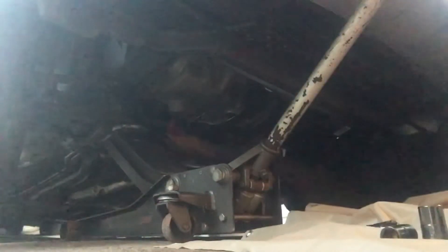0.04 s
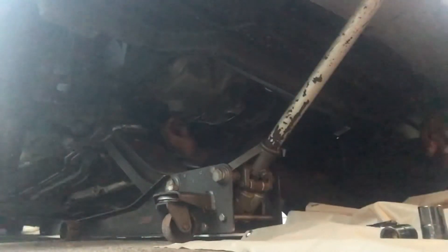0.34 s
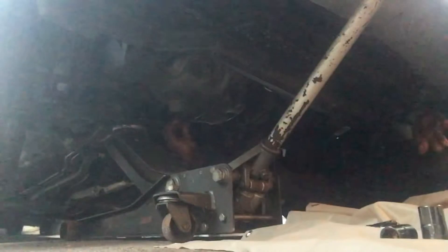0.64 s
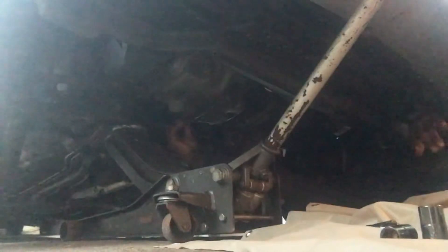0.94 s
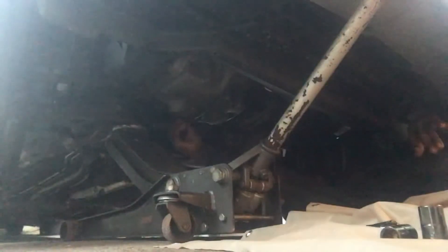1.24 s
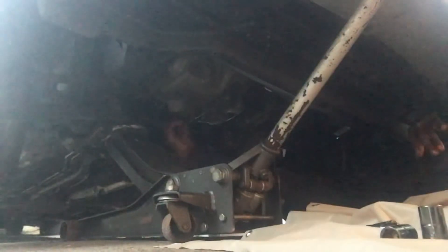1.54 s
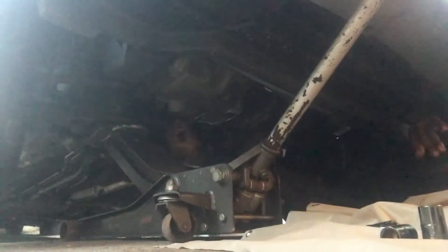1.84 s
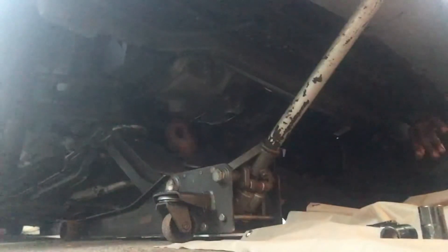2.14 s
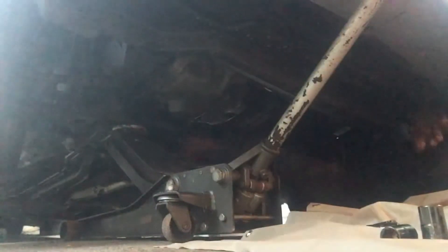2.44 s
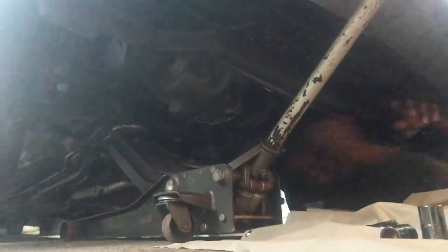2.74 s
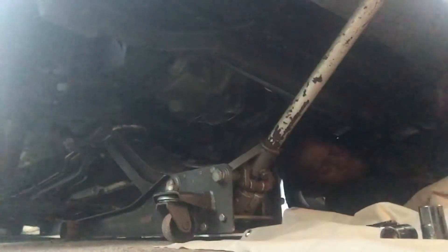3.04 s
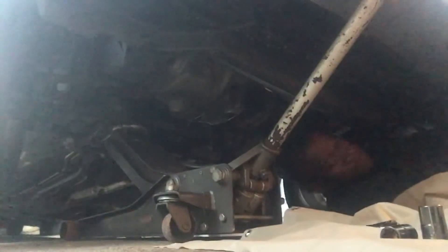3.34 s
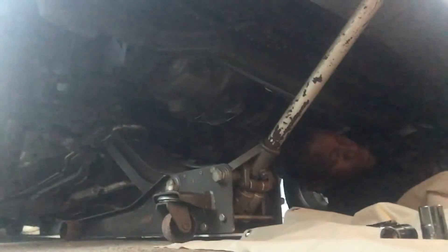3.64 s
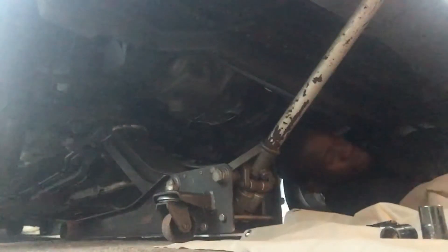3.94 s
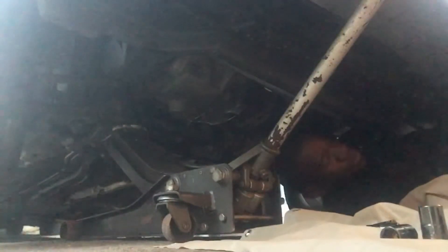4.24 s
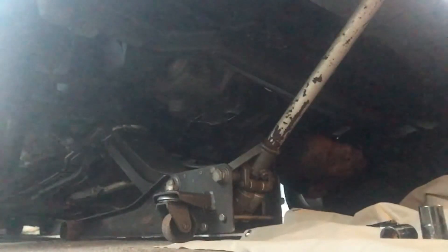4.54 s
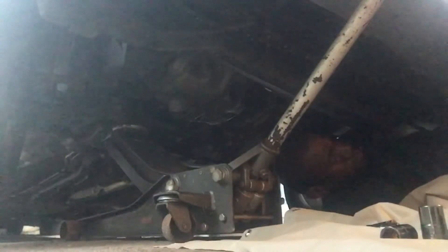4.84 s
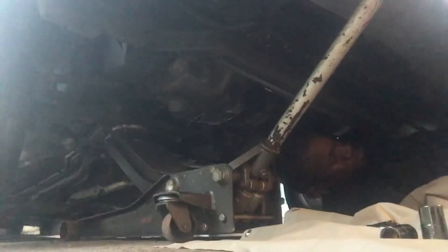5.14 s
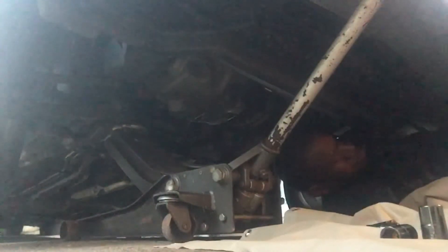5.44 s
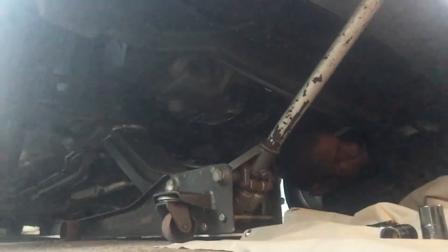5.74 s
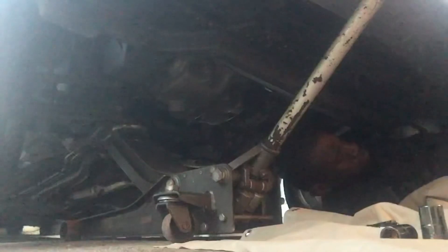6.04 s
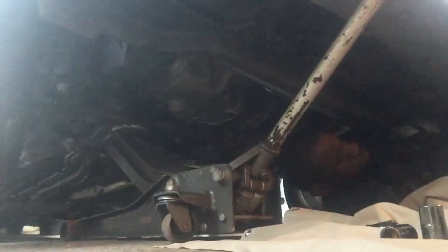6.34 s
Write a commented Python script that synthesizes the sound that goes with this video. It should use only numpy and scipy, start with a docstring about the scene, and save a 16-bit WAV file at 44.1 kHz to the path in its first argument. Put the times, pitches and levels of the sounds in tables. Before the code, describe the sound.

After a faint brush of cloth, a socket wrench clinks unevenly on a bolt under a jacked-up car, each knock ringing briefly. Someone then shifts on a floor sheet: cloth rustles and snaps softly, with dull bumps and the thin ring of a sliding tool. Small metal parts click in the hands, growing fainter. Everything is close to the microphone, with little echo and a faint garage hum behind.

```python
"""A faint brush of cloth, then a socket wrench clinks on its bolt, close by, under a jacked-up car.
Each knock rings the steel and rattles the underbody. The worker then shifts over on a sheet on the
garage floor: cloth rustles and snaps, a weight bumps, a loose steel tool slides and rings, and small
parts click in the hands. All of this is near the microphone, with only a weak, short echo;
a faint hum, a low rumble and a distant drone fill the garage behind it."""
import sys
import numpy as np
from scipy import signal
from scipy.fft import rfft, irfft, next_fast_len
from scipy.io import wavfile
from scipy.ndimage import uniform_filter1d

SR = 44100
rng = np.random.default_rng(int(sys.argv[2]) if len(sys.argv) > 2 else 0)


def generate_wav(signal):
    """Clip the signal to [-1, 1] and save it as 16-bit WAV at the path in sys.argv[1]."""
    frames = np.transpose(np.atleast_2d(signal))
    scaled = np.clip(frames, -1, 1) * 32767
    pcm = np.round(scaled).astype(np.int16)
    wavfile.write(sys.argv[1], SR, pcm)


N = 290291
TIME = np.arange(N) / SR

# room tone of the garage: (frequency [Hz], relative density [dB])
ROOM_SPECTRUM = [(12, -42.5), (20, -37), (47, 3), (103, 1.5), (282, -8.5), (342, -5), (452, -12),
                 (597, -13), (1130, -32), (1380, -38), (1630, -42.5), (2210, -41.5), (4810, -51),
                 (9930, -57), (15500, -64)]
# sounds far from the microphone: (time [s], relative drone level [dB], relative wash level [dB])
DISTANT_LEVELS = [(0.0, -62.5, -57), (0.42, -64.5, -67), (1.8, -64, -71.5), (2.2, -66.5, -77.5),
                  (4.1, -65, -75.5), (5.35, -68.5, -74.5), (5.88, -72, -83), (6.25, -63, -85.5),
                  (6.58, -68, -83.5)]
# resonances of a light drag over the floor:
# (start frequency [Hz], end frequency [Hz], width [Hz], start level [dB], end level [dB])
DRAG_RESONANCES = [(375, 555, 71, -73, -57.5), (980, 1000, 120, -63.5, -73), (2300, 2230, 73, -70, -75),
                   (11000, 10700, 450, -79, -135)]
# dull bumps on the floor: (time [s], level [dB], starting pitch [Hz], length [s])
FLOOR_BUMPS = [(2.278, -46.5, 411, 0.013), (2.281, -45.5, 188, 0.015), (2.63, -50, 276, 0.012),
               (2.649, -45, 379, 0.0192), (3.695, -46.5, 325, 0.0572)]
# rustle of the cloth: (frequency [Hz], relative density [dB])
CLOTH_SPECTRUM = [(120, -10), (220, 0), (400, 6.5), (600, -1.5), (790, 1.5), (1000, -1), (1400, -3),
                  (1750, -2.5), (2450, 0), (3200, -21), (4500, -26.5), (9000, -46)]
# fizz of its brushing fibres: (frequency [Hz], relative density [dB])
FIBRE_SPECTRUM = [(2000, 1.5), (3200, 10), (4200, -1.5), (5200, 3.5), (6500, 6.5), (8000, 1), (9500, -1),
                  (10500, -9.5), (13000, -6.5), (15500, -25)]
# hollow resonances of the gap under the car: (frequency [Hz], width [Hz], relative level [dB])
GAP_RESONANCES = [(591, 112, 2), (940, 94, -3), (1302, 174, -0.5), (2130, 710, -1)]
# cloth dragged over the floor: (time [s], length [s], relative rustle [dB], relative fizz [dB])
CLOTH_STROKES = [(0.0, 0.45, -64.5, -79), (2.244, 0.56, -60.5, -72.5), (2.596, 0.25, -45, -61.5),
                 (2.778, 0.2, -57, -77.5), (3.018, 0.43, -50, -64), (3.403, 0.28, -56.5, -70.5),
                 (3.629, 0.32, -53, -65.5), (3.887, 0.21, -68, -75), (5.184, 0.22, -68.5, -77.5)]
# folds that snap free: (time [s], level [dB], bright edge [dB], hollow note [Hz])
FOLD_SNAPS = [(2.608, -40, -14, 500), (2.645, -40.5, -2, 976), (2.688, -36, 11, 622), (2.726, -45, 18, 587),
              (2.78, -53, 0, 595), (2.802, -37, 0, 616), (2.865, -46, -2, 627), (2.926, -50, 11, 976),
              (2.962, -51.5, -6, 935), (3.062, -45, -9, 597), (3.199, -41.5, -7, 937),
              (3.245, -46.5, -6, 620), (3.37, -46, 24, 564), (3.4, -51, -6, 530), (3.553, -47.5, -6, 950),
              (3.806, -44.5, -3, 1770)]
# modes of the sliding steel tool: (frequency [Hz], relative level [dB], t60 [s])
TOOL_MODES = [(6260, -8, 0.11), (6410, -4.5, 0.33), (6770, -13, 0.13), (8949, 2.5, 0.22), (9800, -14, 0.58),
              (10000, -23, .25), (11260, -29, .15), (11950, -23, .15), (12110, -17, 0.2), (13700, -36, .25),
              (15260, -43, .15)]
# the tool catching on grit: (time [s], frequency [Hz], level [dB], t60 [s])
TOOL_CATCHES = [(3.502, 11700, -58, 0.09), (3.502, 6100, -56, 0.07), (3.519, 4225, -47.5, 0.18),
                (3.519, 3390, -53, 0.08), (3.533, 2520, -50, 0.08)]
# small parts in the hands: (time [s], level [dB], thud [dB], bright edge [dB], pitch [Hz])
PART_CLICKS = [(2.272, -64, 8, -24, 980), (3.8883, -47, -12, -8, 1360), (3.9276, -34.5, -23, -5, 2560),
               (3.9364, -36.5, -11, -18, 1970), (4.143, -45, -2, 4, 3060), (4.1669, -36.5, -2.5, 2, 2720),
               (4.331, -58.5, 7, 6, 1360), (4.634, -58, 7, -12, 2140), (4.7672, -54, -4, 4.5, 2300),
               (4.81, -54.5, -10, 12.5, 3020), (5.0305, -54, -1, -1, 1400), (5.153, -57, -8, -16, 1550),
               (5.189, -60, -4, -21, 1410), (5.271, -57, 9, 0, 1360), (5.4086, -55, -10, -19, 1920),
               (5.449, -59, -13, -4, 2200), (5.467, -56, -10, -15, 2140), (5.53, -56, -2, -18, 2280),
               (5.604, -55.5, 3, 2, 1680), (5.8683, -55.5, -10, -7, 2170)]
# the snap of those parts: (frequency [Hz], relative density [dB])
CLICK_SPECTRUM = [(200, -50), (500, 6), (1000, -1), (1400, 0.5), (2300, 4), (3250, -1), (4400, -12),
                  (7400, -12), (11700, -19.5), (15500, -35)]
# modes of wrench and bolt: (frequency [Hz], relative level [dB], t60 of the lingering ring [s])
WRENCH_MODES = [(973, -6, 0.18), (1055, -2, .2), (1149.6, 4, 0.18), (1263, -1.5, 0.17), (1470, 0.5, 0.16),
                (1616, 9.5, 0.066), (1804, 1.5, 0.17), (2166, 10.5, 0.059), (2282, 13, 0.06),
                (2723, 5.5, 0.076), (2900, -1, 0.193), (3100, 5.5, .1), (3350, 3.5, .04),
                (3490, 9.5, 0.083), (3700, -1, 0.15), (3996, 1.5, 0.099), (4380, 4.5, 0.078),
                (4470, -6, .18), (4700, 0, 0.052), (5130, -4, .07), (5310, -2.5, 0.065), (6280, -13.5, 0.2),
                (6490, -10, 0.085), (6630, -14.5, .17), (7700, -11, .06)]
# dense clatter of the underbody: (frequency [Hz], relative density [dB])
UNDERBODY_SPECTRUM = [(200, -15), (450, -14), (780, -6.5), (1100, -3.5), (1700, 1), (2200, 5.5), (3500, 2),
                      (4700, -6), (5800, -8), (8000, -11.5), (10500, -24.5), (15500, -32)]
# the wrench seating on the bolt:
# (time [s], level [dB], low ring [dB], underbody clatter [dB], main ring [Hz], second ring [Hz])
WRENCH_CLINKS = [(0.2076, -46, 8.5, -5.5, 1160, 1600), (0.3506, -34, 0.5, -16, 3950, 3060),
                 (0.5289, -43, 5, -8, 1120, 2350), (0.684, -45, 3, -10, 4760, 3480),
                 (0.7276, -34.5, 1.5, -14, 2330, 4430), (0.8279, -27, 4.5, -4.5, 1200, 1580),
                 (0.852, -40, 2, -5.5, 2850, 4430), (1.234, -40.5, 1.5, -9, 2700, 1140),
                 (1.245, -39, -1, -11.5, 3620, 4050), (1.4871, -46, 5.5, -4.5, 1135, 2320),
                 (1.584, -45.5, -4, -15, 3460, 1770), (1.7377, -30, 0.5, -12, 2240, 1087),
                 (1.8199, -27.5, 2.5, -8, 1740, 1120), (1.855, -40, -1, -12, 3485, 2700),
                 (2.036, -57, 13, -15, 1170, 1770), (2.0728, -53, 8.5, -15, 1700, 2300),
                 (2.086, -44.5, 0.5, -6, 3540, 4000), (2.21, -46.5, -1, -8, 1600, 3030),
                 (2.2371, -37.5, -1.5, -13, 4330, 4100)]
# steel slipping before it seats, or on the rebound: (time [s], level [dB], low ring [dB], main ring [Hz])
WRENCH_SLIPS = [(0.337, -54.5, 18.5, 1140), (0.348, -40, -7, 3430), (0.722, -41, 1, 2290),
                (0.811, -46, -2, 3760), (1.225, -48, 0, 2330), (1.857, -45.5, -10, 2730),
                (2.226, -34, -8, 2250)]

FIRM_DB = -37  # level of a firm contact; harder ones are brighter, lighter ones duller


def amp(db):
    """Decibels to amplitude."""
    return 10 ** (np.asarray(db) / 20)


def unit_rms(x):
    """Scales x to an rms of 1."""
    return x / np.sqrt(np.mean(x ** 2) + 1e-20)


def add(mix, start_s, sound):
    """Mixes a sound in at its start time."""
    part = mix[round(start_s * SR):][:len(sound)]
    part += sound[:len(part)]


def coloured(x, spectrum):
    """Gives x a smooth spectrum and an rms of 1."""
    hz, db = np.transpose(spectrum)
    size = next_fast_len(len(x))
    bins_hz = np.fft.rfftfreq(size, 1 / SR)
    gain = amp(np.interp(np.log(bins_hz + 1), np.log(hz), db))
    return unit_rms(irfft(rfft(x, size) * gain, size)[:len(x)])


def split(x, hz):
    """The parts of x below and above hz."""
    low = signal.sosfiltfilt(signal.butter(3, hz, fs=SR, output="sos"), x)
    return low, x - low


def wander(per_s):
    """A random drift around zero that takes a new course per_s times a second."""
    knots = rng.standard_normal(4000)
    return 1.6 * np.interp(TIME * per_s, np.arange(len(knots)), knots)


def patchy(x, depth_db):
    """Lets each band of x swell and sink on its own; rms of 1."""
    bands = signal.stft(x, nperseg=512, noverlap=384)[2]
    patches = uniform_filter1d(rng.standard_normal(bands.shape), size=4, axis=0)
    patches = unit_rms(uniform_filter1d(patches, size=8, axis=1))
    return unit_rms(signal.istft(bands * amp(depth_db * patches), nperseg=512, noverlap=384)[1][:N])


def resonate(x, hz, width_hz):
    """A steep resonance that may glide; rms of 1."""
    carrier = np.exp(2j * np.pi * np.cumsum(hz * np.ones(N)) / SR)
    pole = np.exp(-np.pi * width_hz / SR)
    return unit_rms((carrier * signal.lfilter([1], [1, -2 * pole, pole * pole], x / carrier)).real)


def grains(per_s, spread_db):
    """Friction as tiny slips of uneven size."""
    size = amp(spread_db * np.minimum(rng.exponential(1, N), 4))
    return unit_rms((rng.random(N) < per_s / SR) * size * rng.choice([-1, 1], N))


def reflections(size, first_per_s=1500, doubling_s=0.005):
    """Echoes off the underbody and the floor: single spikes at first, soon a dense crowd."""
    doublings = np.minimum(np.arange(size) / SR / doubling_s, 10)
    chance = np.minimum(first_per_s / SR * 2 ** doublings, 1)
    return (rng.random(size) < chance) * rng.choice([-1, 1], size) / np.sqrt(chance)


def contact(sound, low_db, edge_db, rise_s):
    """Where and how hard two things meet sets the low part, the bright edge and the attack."""
    low, rest = split(sound, 2320)
    middle, edge = split(rest, 3540)
    onset = 1 - np.exp(-np.arange(len(sound)) / SR / rise_s)
    return (amp(low_db) * low + middle + amp(edge_db) * edge) * onset


def room_tone(rumble_db=-57, hiss_db=-72, hum_hz=100.9, hum_db=-62.5,
              whine_hz=3275, whine_db=-94.5, tone_db=-91):
    """The garage itself: rumble, distant drone and fading wash, hiss, mains hum and a faint whine."""
    air = patchy(coloured(rng.standard_normal(N), ROOM_SPECTRUM), depth_db=1.7)
    rumble, rest = split(air, 176)
    drone, rest = split(rest, 483)
    wash, hiss = split(rest, 974)
    times, drone_db, wash_db = np.transpose(DISTANT_LEVELS)
    drone_db = np.interp(TIME, times, drone_db) + 1
    wash_db = np.interp(TIME, times, wash_db) - 1
    layers = [(rumble, rumble_db), (drone, drone_db), (wash, wash_db),
              (hiss, hiss_db + 0.25 * (wash_db - wash_db.mean()))]
    bed = sum(unit_rms(noise) * amp(db) for noise, db in layers)
    hum = np.sqrt(2) * np.sin(2 * np.pi * (hum_hz * TIME + 0.12 * wander(4)))
    hum *= amp(hum_db + 1.5 * wander(4.9))
    whine = signal.lfilter(*signal.iirpeak(whine_hz, Q=11, fs=SR), rng.standard_normal(N))
    whine_tone = np.sqrt(2) * np.sin(2 * np.pi * (whine_hz * TIME + 0.3 * wander(25)))
    return bed + hum + amp(whine_db) * unit_rms(whine) + amp(tone_db) * whine_tone


def garage_echo(x, low_t60=0.21, high_t60=0.17, rise_s=0.023):
    """What the garage sends back to the microphone: a diffuse tail whose treble dies first."""
    t = np.arange(SR // 2) / SR
    low, high = split(rng.standard_normal(len(t)), 3600)
    tail = low * amp(-60 * t / low_t60) + high * amp(-60 * t / high_t60)
    tail *= 1 - np.exp(-t / rise_s)
    return signal.fftconvolve(x, tail / np.linalg.norm(tail))[:N]


def floor_drag(start_s=2.265, length_s=0.374, attack_s=0.009, release_s=0.03):
    """Something is drawn over the floor with a faint, hollow scrape whose lowest note climbs."""
    t = TIME - start_s
    progress = np.clip(t / length_s, 0, 1)
    touch = np.clip(np.minimum(t / attack_s, (length_s - t) / release_s), 0, 1)
    rub = grains(3000, 2)
    return touch * sum(resonate(rub, hz + (end_hz - hz) * progress, width)
                       * amp(db + (end_db - db) * progress)
                       for hz, end_hz, width, db, end_db in DRAG_RESONANCES)


def floor_bumps(pitch_sag=0.57, overtone_db=-11, grit_db=-12):
    """A weight rubs to a stop on the floor: a short low judder that slows down."""
    out = np.zeros(N)
    for start_s, level_db, hz, length_s in FLOOR_BUMPS:
        progress = np.linspace(0, 1, int(length_s * SR))
        phase = 2 * np.pi * np.cumsum(hz * (1 - pitch_sag * progress ** 2)) / SR
        grit = coloured(rng.standard_normal(SR // 4), CLOTH_SPECTRUM)[:len(phase)]
        judder = np.sin(phase) + amp(overtone_db) * np.sin(2 * phase) + amp(grit_db) * grit
        add(out, start_s, amp(level_db) * judder * signal.windows.tukey(len(phase), 0.5))
    return out


def cloth_strokes(attack_s=0.043, release_s=0.036, ends_db=-10.5):
    """Envelopes of rustle and fizz: each stroke starts, speeds up to its middle and stops."""
    rustle, fizz = np.zeros((2, N))
    for start_s, length_s, rustle_db, fizz_db in CLOTH_STROKES:
        t = np.arange(0, length_s, 1 / SR)
        touch = np.minimum(t / attack_s, 1) * np.minimum((length_s - t) / release_s, 1)
        arch_db = ends_db * (2 * t / length_s - 1) ** 2
        add(rustle, start_s, touch * amp(rustle_db + arch_db))
        add(fizz, start_s, touch * amp(fizz_db + arch_db))
    return rustle, fizz


def cloth_jerks(typical_per_s=42, release_s=0.0055, lift_db=-1):
    """Cloth sticks and jerks free at uneven intervals; each jerk lifts the rustle for a moment."""
    count = np.floor(np.cumsum(typical_per_s * amp(4 * wander(60))) / SR)
    jerks = np.diff(count, prepend=0) * rng.uniform(0.34, 1, N)
    lift = signal.lfilter([1], [1, -np.exp(-1 / (release_s * SR))], jerks)
    return unit_rms(1 + amp(lift_db) * lift)


def cloth_rustle(rustle_gain_db=-2, patch_db=5.5, crackle_db=-13):
    """Shifting folds catch and let go in clumps, with a light crackle, over a fizz of brushing fibres."""
    clumps = unit_rms(amp(wander(110)))
    rustle_envelope, fizz_envelope = cloth_strokes()
    folds = patchy(coloured(grains(3000, 1.8), CLOTH_SPECTRUM), patch_db)
    crackle = amp(crackle_db) * coloured(grains(400, 2), CLOTH_SPECTRUM)
    rub = grains(3000, 2.8)
    hollow = unit_rms(sum(amp(db) * resonate(rub, hz, width) for hz, width, db in GAP_RESONANCES))
    rustle = unit_rms(folds + crackle + hollow) * cloth_jerks() * amp(rustle_gain_db)
    fizz = patchy(coloured(grains(6000, 2.7), FIBRE_SPECTRUM), patch_db / 2)
    return clumps * (rustle * rustle_envelope + fizz * fizz_envelope)


def fold_snaps(snap_t60=0.031, note_db=-1, note_t60=0.06, note_rise_s=0.0013):
    """A taut fold lets go with a soft snap and a short hollow note."""
    out, t = np.zeros(N), np.arange(SR // 8) / SR
    note_envelope = amp(note_db - 60 * t / note_t60) * (1 - np.exp(-t / note_rise_s))
    for start_s, level_db, edge_db, hz in FOLD_SNAPS:
        burst = coloured(rng.standard_normal(len(t)), CLOTH_SPECTRUM) * amp(-60 * t / snap_t60)
        snap = contact(burst, low_db=1, edge_db=edge_db, rise_s=0.0018)
        note = note_envelope * np.sin(2 * np.pi * hz * t)
        add(out, start_s, amp(level_db) * (snap + note))
    return out


def tool_push(start_s=3.499, length_s=0.063, peak_db=-46, growth_db=10.5, attack_s=0.0026, stop_t60=0.091):
    """Rubbing grows as the tool is pushed ever faster over concrete, and dies as it coasts to a stop."""
    t = TIME - start_s
    pushed_db = growth_db * np.clip(t / length_s - 1, -1, 0)
    coasting_db = -60 * np.maximum(t - length_s, 0) / stop_t60
    return np.clip(t / attack_s, 0, 1) * amp(peak_db + pushed_db + coasting_db)


def sliding_tool(rasp_db=-18, waver_db=2, waver_turns=0.059, catch_rise_s=0.0074):
    """Grit under the sliding steel keeps its high modes singing; lower ones sound only as it catches."""
    push, out = tool_push(), np.zeros(N)
    for hz, db, t60 in TOOL_MODES:
        pole = amp(-60 / (t60 * SR))
        swell = signal.lfilter([1 - pole], [1, -pole], push + 1e-12)
        tone = np.sin(2 * np.pi * (hz * TIME + waver_turns * wander(140)))
        out += amp(db + waver_db * wander(70)) * swell * tone
    for start_s, hz, db, t60 in TOOL_CATCHES:
        fade = amp(db - 60 * TIME / t60 + waver_db * wander(60))
        onset = 1 - np.exp(-TIME / catch_rise_s)
        tone = np.sin(2 * np.pi * (hz * TIME + waver_turns * wander(180)))
        add(out, start_s, onset * fade * tone)
    rasp = sum(amp(db / 2) * signal.lfilter(*signal.iirpeak(hz, Q=60, fs=SR), rng.standard_normal(N))
               for hz, db, _ in TOOL_MODES)
    return out + amp(rasp_db) * push * unit_rms(rasp)


def small_parts(snap_t60=0.023, tail_db=-21, tail_t60=0.18, ring_db=-8, ring_t60=0.03,
                tick_db=7, tick_t60=0.0062):
    """Sockets held in the fingers click: a dry snap, a little thud and one short, damped ring."""
    out, t = np.zeros(N), np.arange(SR // 6) / SR
    snap_fade = amp(-60 * t / snap_t60) + amp(tail_db - 60 * t / tail_t60)
    ring_fade = amp(tick_db - 60 * t / tick_t60) + amp(ring_db - 60 * t / ring_t60)
    for start_s, level_db, thud_db, edge_db, hz in PART_CLICKS:
        low_db = 2 - 0.02 * (level_db - FIRM_DB)
        thud, snap = split(coloured(reflections(len(t)), CLICK_SPECTRUM) * snap_fade, 1200)
        ring = ring_fade * np.sin(2 * np.pi * hz * t)
        click = amp(thud_db) * thud + snap + ring
        add(out, start_s, amp(level_db) * contact(click, low_db, edge_db, rise_s=0.00093))
    return out


def wrench_knocks(firm_edge_db=-2, edge_per_db=1.0441, seat_rise_s=0.00083,
                  slip_clatter_db=-9, slip_edge_db=-9, slip_rise_s=0.0052):
    """Steel meets the bolt: a seating knock is sudden and brighter when harder; a slip starts softly."""
    for start_s, level_db, low_db, clatter_db, *rings_hz in WRENCH_CLINKS:
        edge_db = firm_edge_db + edge_per_db * (level_db - FIRM_DB)
        yield start_s, level_db, low_db, clatter_db, edge_db, seat_rise_s, rings_hz
    for start_s, level_db, low_db, ring_hz in WRENCH_SLIPS:
        yield start_s, level_db, low_db, slip_clatter_db, slip_edge_db, slip_rise_s, [ring_hz]


def socket_wrench(crack_db=7, crack_delay_s=0.00051, clatter_t60=0.085,
                  ring_db=-1.5, linger_db=-18, seated_t60_ratio=0.51,
                  scatter_db=1.5, favour_db=6.5, favour_octaves=0.14,
                  chatter_db=-8, chatter_t60=0.074, strike_t60=0.015):
    """Each knock: a crack, ringing steel, the socket chattering on the bolt, a clatter under the car."""
    out, t = np.zeros(N), np.arange(SR // 3) / SR
    hz, db, t60 = np.transpose(WRENCH_MODES)[:, :, None]
    # the bolt soaks up most of the ring at once; a weak part lingers in the handle
    decay = amp(-60 * t / (t60 * seated_t60_ratio)) + amp(linger_db - 60 * t / t60)
    # the direct sound reaches the microphone as one sharp spike; a slow rise smothers it
    spike = coloured(signal.unit_impulse(len(t), int(crack_delay_s * SR)), UNDERBODY_SPECTRUM)
    crack = amp(crack_db - 60 * t / clatter_t60) * spike / abs(spike).max()
    for start_s, level_db, low_db, clatter_db, edge_db, rise_s, rings_hz in wrench_knocks():
        scatter, detune, phase = rng.standard_normal((3, len(WRENCH_MODES), 1))
        # the point of contact favours one or two groups of modes
        octaves_away = np.log2(hz / np.array(rings_hz))
        favoured = np.exp(-(octaves_away / favour_octaves) ** 2).max(1, keepdims=True)
        heights = amp(db + scatter_db * scatter + favour_db * favoured)
        # the grip of the hand shifts the modes a little from knock to knock
        gripped_hz = hz * (1 + 0.0019 * detune)
        tones = heights * np.sin(2 * np.pi * (gripped_hz * t + phase)) / np.sqrt(np.sum(heights ** 2) / 2)
        ring = amp(ring_db) * (decay * tones).sum(0)
        # the loose socket strikes the same modes again and again, damping them each time
        strike = tones.sum(0) * amp(-60 * t / strike_t60)
        bounces = reflections(len(t)) * amp(chatter_db - 60 * t / chatter_t60)
        chatter = signal.fftconvolve(bounces, strike / np.linalg.norm(strike))[:len(t)]
        clatter = coloured(reflections(len(t)), UNDERBODY_SPECTRUM)
        clatter *= amp(clatter_db - 60 * t / clatter_t60)
        knock = contact(crack + ring + chatter + clatter, low_db, edge_db, rise_s)
        add(out, start_s, amp(level_db) * knock)
    return out


def scene(echo_db=-19):
    """One microphone by the car: the work close up, its short echo and the room tone behind."""
    near = socket_wrench() + small_parts() + floor_bumps()
    near += cloth_rustle() + fold_snaps() + floor_drag() + sliding_tool()
    return (near + amp(echo_db) * garage_echo(near) + room_tone())[None]


def record(dry, cutoff_hz=15750):
    """The microphone chain passes nothing above its band limit."""
    lowpass = signal.firwin(255, cutoff_hz, window=("kaiser", 8), fs=SR)
    return signal.oaconvolve(dry, lowpass[None], "same")


dry = scene()
out = record(dry)
generate_wav(out)
```